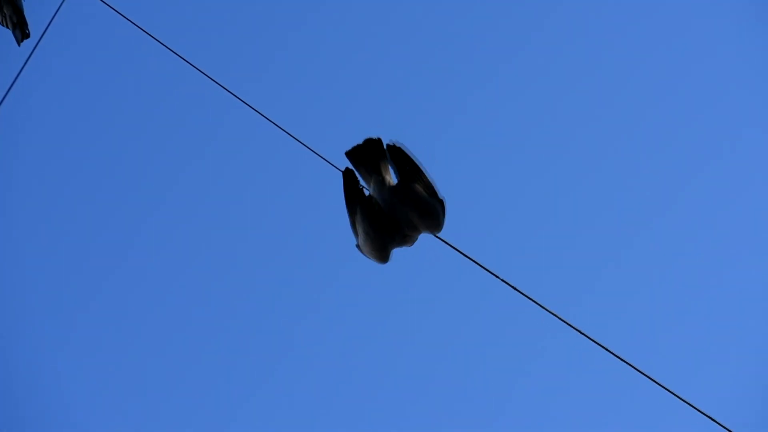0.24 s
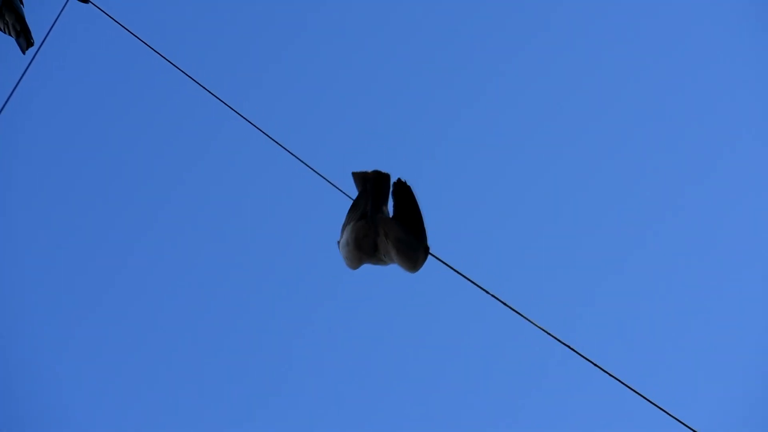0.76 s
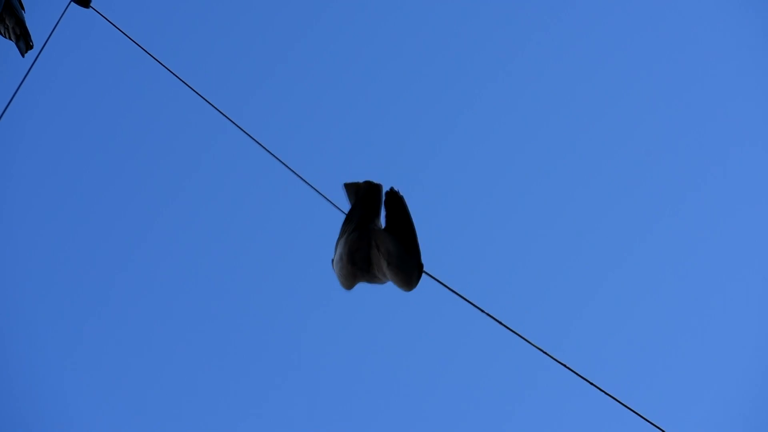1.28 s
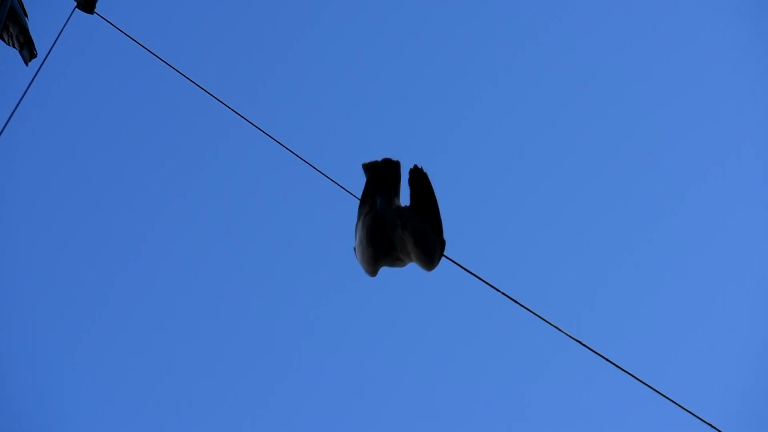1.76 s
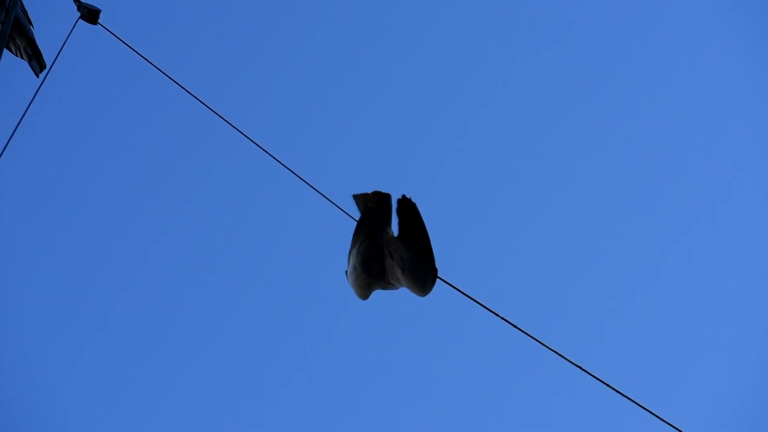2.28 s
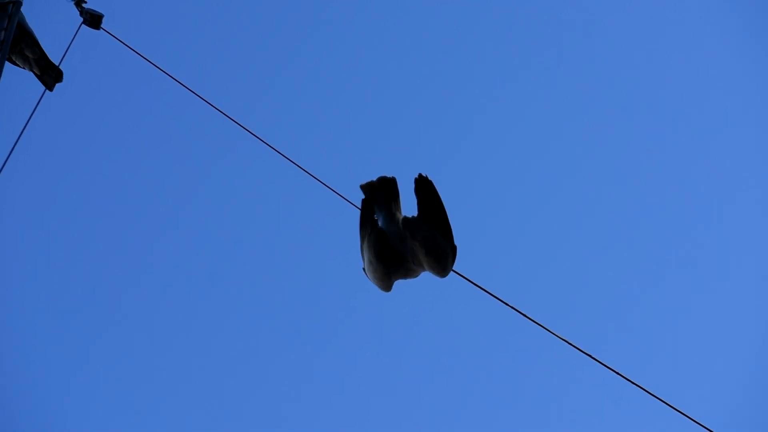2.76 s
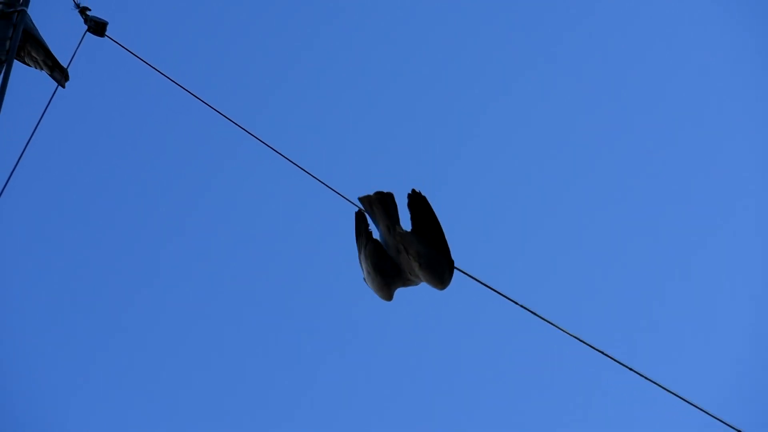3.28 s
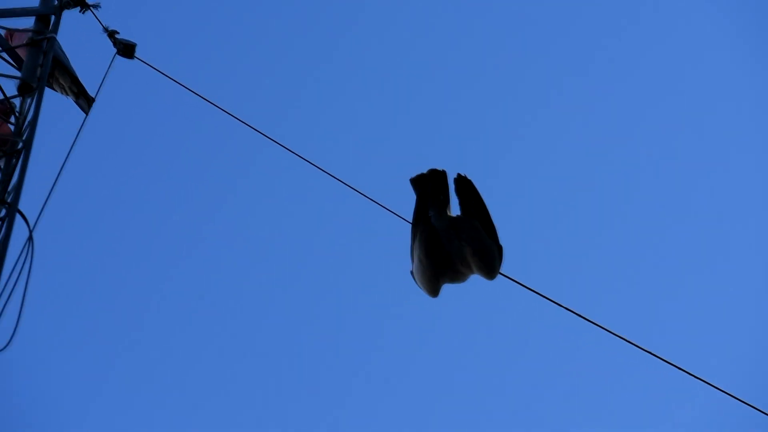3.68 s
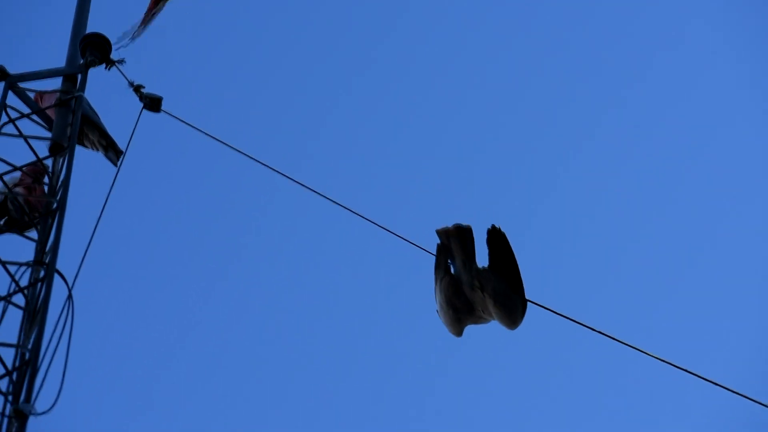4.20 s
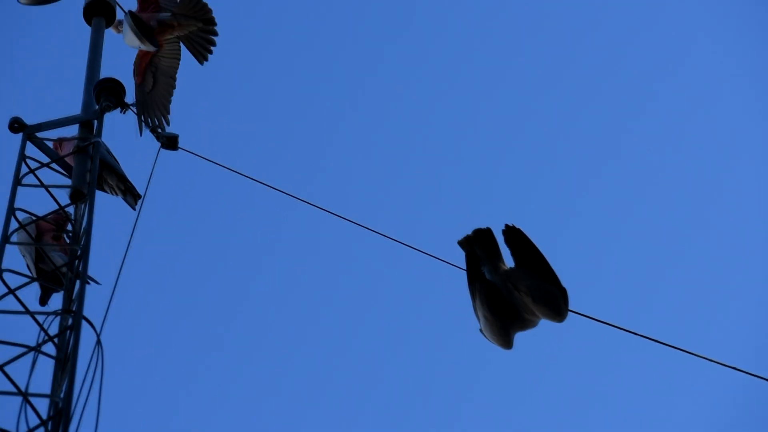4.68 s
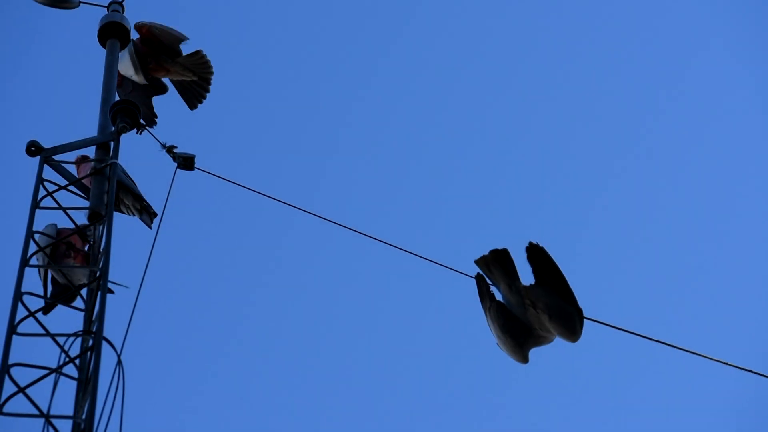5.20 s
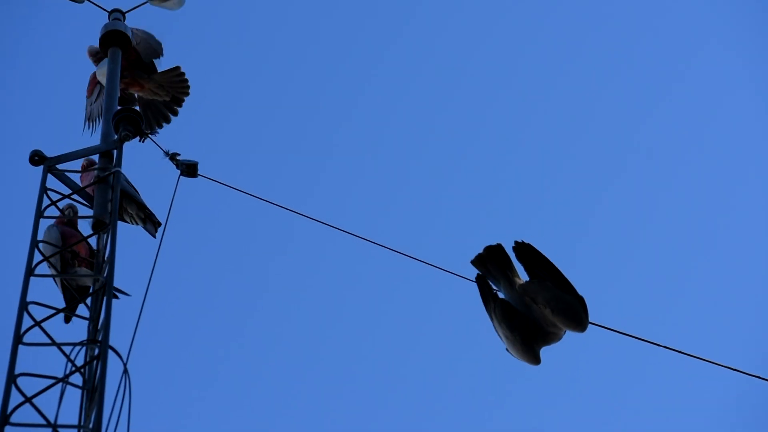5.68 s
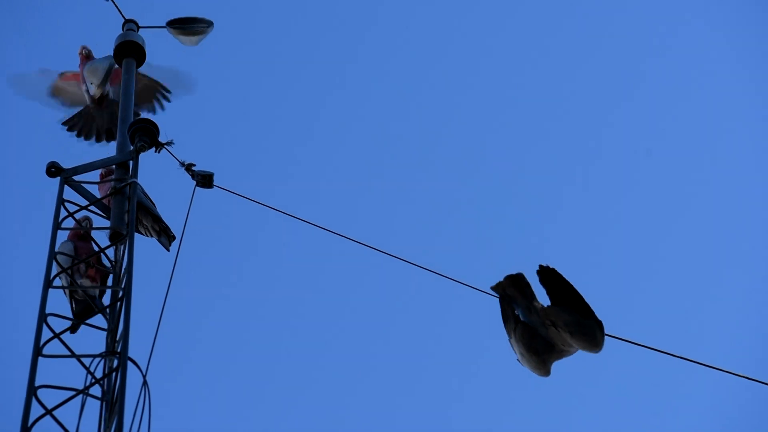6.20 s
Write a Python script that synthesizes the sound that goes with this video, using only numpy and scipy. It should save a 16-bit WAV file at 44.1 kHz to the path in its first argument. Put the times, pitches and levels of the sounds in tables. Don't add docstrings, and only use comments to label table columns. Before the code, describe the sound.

Pink-and-grey parrots on wires and a mast screech, whistle and grunt with rustling feathers, echoing in open air, ending in harsher squawks.

```python
import sys
import numpy as np
from scipy import signal
from scipy.fft import rfft, irfft
from scipy.io import wavfile
from scipy.ndimage import uniform_filter1d

SR = 44100
rng = np.random.default_rng(int(sys.argv[2]) if len(sys.argv) > 2 else 0)


def voltage_ratio(level):
    return 10 ** (np.asarray(level, float) / 20)


def dump(signal):
    limited = np.clip(np.atleast_2d(signal).T, -1, 1)
    pcm = np.round(limited * 32767).astype(np.int16)
    wavfile.write(sys.argv[1], SR, pcm)


N = 284445
GRUNT_PAN_DB = -5.5


def evened(x):
    return x / np.sqrt(np.mean(x ** 2) + 1e-20)


def read(points, hz):
    f, value = np.transpose(points)
    return np.interp(np.log(hz + 1), np.log(f + 1), value)


def colour(x, points):
    size = x.shape[-1]
    gain = voltage_ratio(read(points, np.fft.rfftfreq(size, 1 / SR)))
    return evened(irfft(rfft(x) * gain, size))


def wobble(size, hz):
    width = max(int(SR / hz / 2), 1)
    smooth = uniform_filter1d(rng.standard_normal(size), width)
    return evened(uniform_filter1d(smooth, width))


def curves(rows, fade_s):
    s, *columns = np.transpose(rows)
    t = np.arange(s[0], s[-1], 1 / SR)
    fade = np.clip(np.minimum(t - s[0], s[-1] - t) / fade_s, 0, 1)
    return s[0], fade, [np.interp(t, s, c) for c in columns]


def add(mix, s, sound, pan_db):
    lag = rng.choice([0, 1, 1, 1])
    start = round(s * SR) + 1
    for side, sign, at in zip(mix, (.5, -.5), (start, start + lag)):
        part = side[at:][:len(sound)]
        part += sound[:len(part)] * voltage_ratio(sign * pan_db)


def screech(rows, loose=1):
    # frequency in Hz, level in dB per Hz
    rasp_colour = [(1060, -48), (1800, -40), (2930, -10.5), (3860, 2), (5300, -3), (6750, -10.5),
                   (7920, -21), (10300, -26.5), (15000, -42)]
    # frequency in Hz, level in dB per Hz
    crop_colour = [(450, -20), (700, 3.5), (1500, -5), (2300, -24), (3200, -17)]
    s, fade, (hz, db, rasp_db) = curves(rows, .01 * loose)
    size = len(hz)

    jitter = np.clip(0.03 + 0.00089 * (rasp_db - db).mean(), .008, .03) * loose
    high = 2 * np.pi * np.cumsum(hz * (1 + jitter * wobble(size, 218))) / SR
    drift = 0.084 * loose * wobble(size, 25.6) + 0.0528 * loose * wobble(size, 348)
    low = 2 * np.pi * np.cumsum(np.linspace(820, 720, size) * (1 + drift)) / SR
    voice = np.sin(high) + voltage_ratio(-7.5 + 0.22 * (db + 10.0)) * np.sin(2 * high)
    chop = sum(voltage_ratio(4.5 * loose * wobble(size, 25)) * np.cos(k * low + k ** 2) for k in range(1, 8))

    strain = .2 * (rasp_db.max() + 20)
    size_share = hz.mean() / 4000
    throat = [(f * size_share, height + strain * np.log2(f / 4000)) for f, height in rasp_colour]
    puffs = np.exp(.6 * np.cos(low)) * rng.standard_normal(size)
    sidebands = colour(chop * voice, throat)
    rasp = evened(.75 * sidebands + .45 * loose * colour(puffs, throat))
    highs = signal.sosfilt(signal.butter(2, 6000, "high", fs=SR, output="sos"), rasp)
    rasp = rasp + highs * (voltage_ratio(2.0 + 0.2 * (rasp_db - rasp_db.max())) - 1)

    buzz = .7 * np.sin(low) + .8 * np.sin(2 * low) + .35 * np.sin(3 * low)
    buzz = buzz * voltage_ratio(3 * wobble(size, 30)) + 0.31 * colour(puffs, crop_colour)
    buzz = voltage_ratio(-15.0 - 7.7 * np.maximum(strain, 0)) * buzz
    throb = voltage_ratio(3.2 * loose * wobble(size, 180))
    return s, fade * (0.83 * voltage_ratio(db) * throb * voice + voltage_ratio(rasp_db) * (rasp * throb ** 0.12 + buzz))


def effort(s, length, hz, db, rasp_db, hold, pitch, voice_db, breath_db):
    def shape(ends, middle):
        return np.array([ends[0], middle, middle, ends[1]])
    return np.transpose([s + length * np.array([0, *hold, 1]), hz * shape(pitch, 0.98),
                         db + shape(voice_db, 0), rasp_db + shape(breath_db, 0)])


def add_screeches(mix):
    # start in seconds, length in seconds, high voice in Hz, its level in dB, rasp in dB
    thin = [(.89, 0.24, 3806, -25.5, -41), (1.1, 0.2, 3990, -26, -46), (1.585, .13, 4015, -33.5, -57),
            (1.92, 0.19, 3720, -26.5, -53), (2.13, .19, 3923, -24.5, -46.5),
            (2.855, 0.093, 3560, -29.5, -40), (3.06, 0.11, 3850, -30, -47),
            (3.79, 0.067, 3750, -32.5, -50.5), (3.89, 0.096, 3826, -30.5, -53),
            (3.96, 0.15, 3670, -35.5, -47), (4.18, 0.18, 3744, -28.5, -50.5),
            (4.36, 0.18, 3540, -34.5, -53.5), (4.07, 0.12, 4480, -36, -46.5), (.97, 0.17, 4480, -37.5, -38),
            (1.86, 0.16, 4520, -40.5, -52), (5.86, 0.17, 3720, -34.5, -41)]
    harsh = [(5.0, 0.16, 4057, -19, -26.5), (5.147, 0.15, 3780, -19.5, -25),
             (5.27, 0.15, 3830, -21.5, -25.5), (5.36, .11, 4270, -28.5, -27.5),
             (6.198, .225, 3962, -11.5, -17)]
    swelling = [
        (5.46, .16, 4060, -18, -22),
        (5.635, .25, 3790, -19, -18),
    ]
    sudden = [
        (3.397, 0.13, 3335, -30.5, -36),
        (5.993, .15, 4800, -21, -19.5),
    ]
    # pitch share, voice dB, rasp dB
    kinds = ((thin, -1.7, (0.396, 0.532), (1.01, 0.95), (-9.5, -15.5), (1.5, 1.7)),
             (harsh, -1.2, (0.22, 0.59), (0.98, 1), (-15, -29.5), (-12.5, -12.5)),
             (swelling, -0.78, (.45, 0.55), (0.85, 0.93), (-14.5, -20), (-12.5, -11.5)),
             (sudden, -0.56, (0.1473, 0.576), (.92, 0.85), (-3, -24), (-18, -17)))
    for rows, pan_db, *shape in kinds:
        for row in rows:
            add(mix, *screech(effort(*row, *shape)), pan_db)


def beak_db(hz):
    return 5 * np.maximum(hz / 1000 - 7.2, 0)


def whistle(second_db, third_db, rough, rows):
    s, fade, (hz, db) = curves(rows, .004)
    size = len(hz)
    rough = np.clip(rough, .2, 1)
    phase = 2 * np.pi * np.cumsum(hz * (1 + .03 * rough * wobble(size, 110))) / SR
    slack_db = 0.68 * (db - db.max())
    tone = np.sin(phase)
    for k, height_db in ((2, second_db), (3, third_db), (4, third_db)):
        tone += voltage_ratio(height_db + slack_db - beak_db(k * hz)) * np.sin(k * phase)
    tone *= 1 + .4 * rough * wobble(size, 800)
    quaver_db = 5 * rough * np.tanh(wobble(size, 120))
    return s, np.sqrt(2) * fade * voltage_ratio(db + quaver_db) * tone


def grunt(length, first_hz, last_hz, db, tilt_db):
    t = np.arange(0, length, 1 / SR)
    phase = 2 * np.pi * np.cumsum(np.linspace(first_hz, last_hz, len(t))) / SR
    k = np.arange(1, 11)[:, None]
    beak_loss_db = 4.1 * np.maximum(k * first_hz / 1000 - 4.5, 0)
    upper_db = tilt_db * (np.minimum(k, 4) - 2) - 1.3 * np.maximum(k - 4, 0) - beak_loss_db
    heights_db = np.where(k == 1, -4, upper_db)
    stack = (voltage_ratio(db + heights_db) * np.sin(k * phase + 0.853 * k ** 2)).sum(0)
    return np.sqrt(2) * stack * np.clip(np.minimum(t / 0.003, (length - t) / 0.0017), 0, 1)


def add_compound_call(mix, s, db, top_hz, dip_hz, dip_at):
    # frequency in Hz, level in dB per Hz
    breath_colour = [(2500, -31), (4000, -9), (6000, -2), (9500, 0), (10800, -31), (13000, -42),
                     (14500, -28), (15500, -30)]
    pan_db = -3.5
    rasp_s = s + .037 + .04 * np.array([0, .2, .3, 1])
    rasp_rows = [rasp_s, (4934, 4800, 3945, 3943),
                 db + np.array([-15, -9.5, -1, -6.5]), db + np.array([-14, -5.5, -12, -6.5])]
    add(mix, *screech(np.transpose(rasp_rows), loose=.55), pan_db)

    dip_start, dip_s = s + .08, .037
    at = dip_start + dip_s * np.array([0, dip_at, (1 + dip_at) / 2, 1])
    dip_rows = [at, top_hz - dip_hz * np.array([0, 1, 0, 0]), db + np.array([-1, -1, 0, -3])]
    add(mix, *whistle(-19, -18, .5, np.transpose(dip_rows)), pan_db)
    breath = colour(rng.standard_normal(round(dip_s * 1.3 * SR)), breath_colour)
    breath *= voltage_ratio(db - 24) * signal.windows.tukey(len(breath), .4)
    add(mix, dip_start - .006, breath, pan_db)
    add(mix, s + .113, grunt(.011, 775, 775, db - 25.5, 1.5), GRUNT_PAN_DB)


def add_loud_calls(mix):
    # start in seconds, level in dB, whistle in Hz, dip in Hz, place of the dip 0-1
    compound_calls = [
        (0.343, -6, 4950, 271, 0.48),
        (0.585, -5.5, 5047, 532, 0.37),
    ]
    # time in seconds, pitch in Hz, level in dB
    chirps = [
        [(.338, 3030, -42), (.352, 3210, -36), (.36, 3530, -26), (.3615, 5290, -28), (.366, 4600, -22),
         (.371, 4590, -10), (.3735, 4030, -12), (.377, 4000, -21)],
        [(.583, 3020, -36), (.595, 3110, -25), (.603, 3390, -20), (.606, 3280, -29), (.611, 3570, -9),
         (.6125, 3660, -12), (.6145, 4000, -9), (.618, 4900, -25)],
    ]
    for row in compound_calls:
        add_compound_call(mix, *row)
    for rows in chirps:
        add(mix, *whistle(-17, -34, .6, rows), -3.5)


def add_glides(mix):
    # time in seconds, pitch in Hz, level in dB
    yelp = [(1.429, 4020, -27), (1.439, 4104, -7), (1.441, 3730, -15), (1.447, 3500, -8),
            (1.4508, 3844, -4.5), (1.451, 4840, -10), (1.459, 4340, -6)]
    # 2nd harmonic in dB, roughness 0-1, then rows of time in seconds, pitch in Hz, level in dB
    swoops = [(-9, 0.32, [(0, 2135, -38.5), (.05, 2130, -55), (.14, 2110, -63)]),
              (-9, 0.465, [(2.66, 3610, -28), (2.676, 3600, -28.5), (2.694, 3290, -26), (2.73, 3250, -31),
              (2.8, 3280, -47)]), (-27, 0.43, [(3.9, 2120, -51), (3.92, 1855, -37), (3.945, 1950, -38),
              (3.96, 2134, -42), (4.0, 2040, -54)]), (6.5, 0.18, [(.163, 2494, -41), (.18, 2650, -32),
              (.195, 2300, -29.5), (.203, 2500, -44)]), (6, 0.4, [(1.105, 2460, -41), (1.13, 2134, -26.5),
              (1.147, 2300, -33)]), (-2.5, 0.26, [(1.285, 2270, -35), (1.3, 2940, -39), (1.318, 2850, -38),
              (1.332, 3073, -29.5), (1.36, 3145, -31), (1.375, 2900, -29.5), (1.4, 2540, -26),
              (1.435, 2480, -28)]), (-9, 0.29, [(2.168, 1973, -29), (2.185, 1932, -29.5), (2.2, 1518, -36),
              (2.25, 1510, -55), (2.305, 1630, -33.5)]), (6.5, 0.16, [(3.125, 2630, -32.5),
              (3.155, 1960, -31), (3.19, 2117, -42.5), (3.22, 2278, -26), (3.24, 2137, -32.5),
              (3.252, 2310, -34), (3.26, 2160, -80)]), (-2, 0.51, [(4.28, 2970, -52), (4.318, 2020, -33.5),
              (4.338, 2523, -28.5), (4.385, 2565, -28.5), (4.42, 2493, -36.5), (4.55, 2530, -53)]),
              (-3.5, 0.4, [(4.755, 2836, -44.5), (4.805, 2914, -40), (4.822, 2466, -31.5),
              (4.843, 2224, -28), (4.878, 2630, -30)])]
    pair = [
        (4, 0.47, [(2.525, 2600, -34), (2.545, 2770, -32.5), (2.565, 2853, -31.5), (2.578, 2740, -30), (2.6, 2780, -33.5), (2.625, 2780, -33.5), (2.645, 2830, -44)]),
        (3.5, 0.43, [(2.7, 2600, -36), (2.715, 2770, -33), (2.748, 2910, -27.5), (2.758, 2756, -31), (2.766, 2894, -32), (2.81, 2895, -34.5), (2.84, 2880, -45)]),
        (-6, .3, [(2.49, 3460, -32), (2.5, 3430, -25), (2.545, 3410, -27), (2.63, 3393, -40), (2.66, 3540, -38)]),
    ]
    add(mix, *whistle(-15.5, -6, .37, yelp), -5.5)
    for second_db, rough, rows in swoops + pair:
        add(mix, *whistle(second_db, -21, rough, rows), -5.5)


def note(s, length, first_hz, last_hz, db, curl, arch, loudest, first_db, last_db):
    u = np.linspace(0, 1, num=12)
    hz = (first_hz + (last_hz - first_hz) * u ** curl) * (1 + arch * np.sin(np.pi * u))
    swell_db = np.interp(u, [0, np.clip(loudest, .05, .95), 1], [first_db, 0, last_db])
    return np.transpose([s + length * u, hz, db + swell_db])


def add_notes(mix):
    # start in seconds, length in seconds, first pitch in Hz, last pitch in Hz, level in dB
    reedy = [(.26, 0.099, 2830, 2830, -47.5), (1.23, 0.11, 1547, 1404, -48), (3.0, 0.04, 1279, 1270, -42.5),
             (5.26, 0.036, 2320, 2290, -31.5)]
    mellow = [(.828, 0.022, 2500, 2440, -37.5), (1.768, 0.018, 1400, 1360, -36),
              (1.81, 0.018, 2070, 2040, -33.5), (2.138, 0.019, 2260, 2080, -32),
              (2.365, 0.026, 2144, 2005, -42), (2.457, 0.066, 3240, 3315, -34.5),
              (3.402, 0.1, 4460, 4440, -38), (3.41, 0.058, 3000, 2980, -38), (1.318, .03, 2320, 2300, -41),
              (5.482, 0.029, 2710, 2600, -31.5), (4.82, 0.052, 3070, 2990, -31.5),
              (5.628, 0.014, 2660, 2600, -27.5)]
    pure = [(1.79, .14, 1387, 1362, -49), (1.87, .025, 1170, 1140, -44), (2.285, 0.037, 1060, 1040, -43.5),
            (.376, 0.049, 764, 732, -38.5), (.616, 0.038, 776, 748, -38.5), (.15, 0.011, 3090, 3560, -37),
            (.585, 0.045, 2150, 1570, -46.5), (2.52, 0.065, 944, 899, -37), (3.625, 0.042, 2250, 2200, -50),
            (3.665, 0.098, 2224, 2560, -47), (3.9, 0.52, 1490, 1388, -52), (4.882, 0.02, 3440, 4060, -25)]
    # (curl of the glide, arch share, loudest place 0-1, first and last dB)
    kinds = ((reedy, -3.5, (2, -9, .65), (1.1, .03, .45, -5, -7)),
             (mellow, -5, (-9, -26, .4), (.35, .001, .3, -4, -9)),
             (pure, -3, (-30, -42, 0.7), (1.25, .001, 0.4, -2, -5)))
    for rows, pan_db, voice, shape in kinds:
        for row in rows:
            add(mix, *whistle(*voice, note(*row, *shape)), pan_db)


def add_grunts(mix):
    # glide as a share of the pitch, then rows of start in seconds, length in seconds,
    # pitch in Hz, level in dB, tilt in dB per harmonic
    groups = [
        (-.1, [(1.005, 0.031, 619, -33, -4.5), (3.259, 0.026, 482, -38.5, -2.5), (4.434, 0.0097, 448, -40, -1), (4.908, 0.017, 490, -38, -1.5), (5.13, 0.031, 618, -40.5, -2.5), (5.2, 0.036, 740, -34.5, -3.5), (5.33, 0.039, 704, -37.5, -3), (5.52, 0.053, 704, -40, -5), (5.86, 0.065, 625, -47.5, 0.5)]),
        (-.015, [(.248, 0.0097, 525, -46.5, 0), (.312, 0.02, 526, -49.5, -10), (1.421, 0.02, 1105, -37.5, -20), (3.097, 0.017, 645, -29.5, -5.5), (4.319, 0.0091, 429, -40, 1), (4.865, 0.036, 1083, -38.5, -20), (5.056, 0.032, 816, -30.5, -9.5), (5.625, 0.033, 783, -41, -7), (6.035, 0.046, 805, -42, -5)]),
        (.1, [(1.456, .012, 722, -25, -6), (2.091, 0.028, 604, -33.5, -4), (2.856, 0.0047, 673, -30.5, -6), (4.381, 0.045, 625, -35.5, -15)]),
    ]
    for glide, rows in groups:
        for s, length, hz, db, tilt_db in rows:
            sound = grunt(length, hz * (1 - glide / 2), hz * (1 + glide / 2), db, tilt_db)
            add(mix, s, sound, GRUNT_PAN_DB)


def flock():
    mix = np.zeros((2, N))
    add_loud_calls(mix)
    add_glides(mix)
    add_notes(mix)
    add_screeches(mix)
    add_grunts(mix)
    return mix


def ports(x):
    dying_s = 0.0022
    t = np.arange(0, 3 * dying_s, 1 / SR)
    taps = rng.standard_normal(len(t)) * np.exp(-t / dying_s)
    highs = signal.sosfilt(signal.butter(2, 6300, "high", fs=SR, output="sos"), x.mean(0))
    side = voltage_ratio(-4) * signal.oaconvolve(highs, taps / np.linalg.norm(taps))[:N]
    return x + np.array([side, -side])


def noise(points, same, grain_db, grain_hz):
    a, b = rng.standard_normal((2, N))
    pair = np.array([a, same * a + np.sqrt(1 - same ** 2) * b])
    return colour(pair * voltage_ratio(grain_db * wobble(N, grain_hz)), points)


def patchy(x, depth_db, bins, frames):
    z = signal.stft(x, SR, nperseg=512)[2]
    field = uniform_filter1d(rng.standard_normal(z.shape[1:]), bins, axis=0)
    field = evened(uniform_filter1d(field, frames, axis=1))
    return evened(signal.istft(z * voltage_ratio(depth_db * field), SR, nperseg=512)[1][:, :N])


def stroke_gain(strokes, rise_s):
    s, db, dying = np.transpose(strokes)[:, :, None]
    since = np.maximum(np.arange(0, N, 32) / SR - s, 0)
    gain = (voltage_ratio(db) * (1 - np.exp(-since / rise_s)) * np.exp(-since / dying)).sum(0)
    return np.repeat(gain, 32)[:N]


def wings():
    # start in seconds, level in dB, dying time in seconds
    flicks = [(1.549, -40, 0.0043), (1.83, -34, 0.034), (1.9, -47.5, 0.1), (1.975, -31.5, 0.1),
              (2.31, -39, 0.081), (2.95, -39.5, 0.12), (2.985, -39, 0.093), (3.657, -36, 0.0055),
              (4.546, -38, 0.0054), (4.604, -41, 0.0052), (4.59, -43.5, 0.071), (4.77, -39, 0.022),
              (6.322, -23, 0.029)]
    flaps = [
        (2.46, -32.5, 0.063),
        (2.56, -40.5, 0.19),
        (2.85, -39.5, 0.05),
        (3.4, -35.5, 0.063),
    ]
    # frequency in Hz, level in dB per Hz
    feather = [(500, -18.5), (2000, -14), (6000, -0.5), (10500, -11), (14500, -14.5)]
    draught = [(30, -60), (90, -30), (250, -8.5), (900, -11.5), (2000, -19.5), (9000, -33.5)]
    flutter = patchy(noise(feather, .3, 2.0, 300), 4.5, 2, 9)
    rustle = stroke_gain(flicks, 0.0015) * flutter * voltage_ratio(np.array([[-1], [1]]))
    return rustle + stroke_gain(flaps, 0.0093) * noise(draught, 0.73, 2.3, 77)


def echoes(x):
    # frequency in Hz, time to fall 60 dB in seconds
    decay = [(600, 0.3), (4500, 0.25), (9000, 0.22), (14500, .15)]
    taps = np.zeros((2, SR // 2))
    slots = np.arange(300, SR // 2 - 40, 40)
    at = slots + rng.integers(0, 40, (2, len(slots)))
    np.put_along_axis(taps, at, rng.standard_normal(at.shape), 1)
    taps[1] = 0.6 * taps[0] + 0.82 * taps[1]
    hz, t, z = signal.stft(taps, SR, nperseg=256)
    tail = signal.istft(z * voltage_ratio(-60 * t / read(decay, hz)[:, None]), SR, nperseg=256)[1]
    tail = tail / np.linalg.norm(tail, axis=1)[:, None]
    return signal.fftconvolve(x, tail, axes=1)[:, :N]


def far_flock(calls):
    # frequency in Hz, level in dB per Hz
    chatter = [(300, -17.5), (700, 0), (2300, -4), (3900, 4), (8000, -11), (10000, -27.5)]
    streaks = patchy(noise(chatter, .6, 2, 5), 4.5, 2, 12)
    power = (calls ** 2).mean(0)
    heard = uniform_filter1d(power, SR // 4, origin=SR // 10, mode="constant")
    excitement = np.minimum(np.sqrt(abs(heard)), .05)
    return (voltage_ratio(-57.0) + voltage_ratio(-16.0) * uniform_filter1d(excitement, SR // 8)) * streaks


def hush():
    # frequency in Hz, level in dB per Hz
    hush_colour = [(24, -38), (40, -8.5), (477, -0.5), (660, -1), (1750, -6.5), (3530, -5.5), (7490, -11.5),
                   (8280, -14), (15900, -20)]
    return voltage_ratio(-50) * noise(hush_colour, 0.44, 1.0, 13)


def scene():
    calls = flock()
    near = ports(calls) + wings()
    return voltage_ratio(-1.5) * near + voltage_ratio(-8.5) * echoes(near) + far_flock(calls) + hush()


def band_limit(x):
    return signal.sosfilt(signal.butter(12, 16020, fs=SR, output="sos"), x)


def record(dry):
    edge = signal.firwin(255, 16050, window=("kaiser", 9), fs=SR)[None]
    overloaded = dry / (1 + abs(dry) ** 8) ** (1 / 8)
    return band_limit(signal.oaconvolve(overloaded, edge, "same"))


dry = scene()
out = record(dry)
dump(out)
```